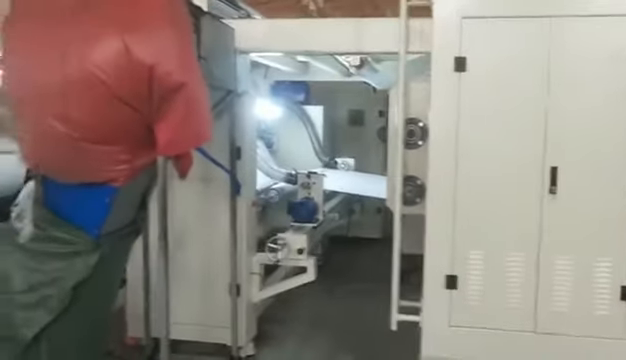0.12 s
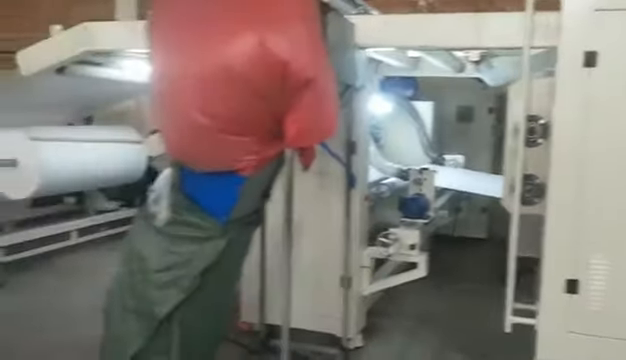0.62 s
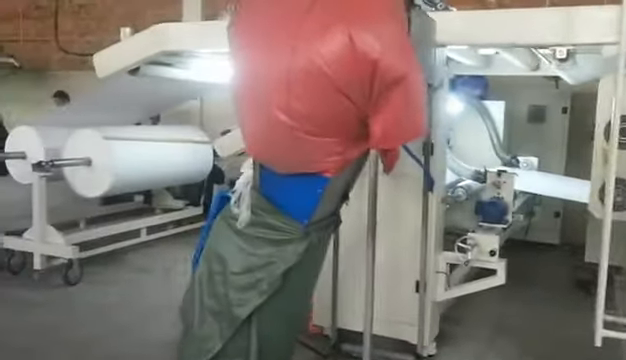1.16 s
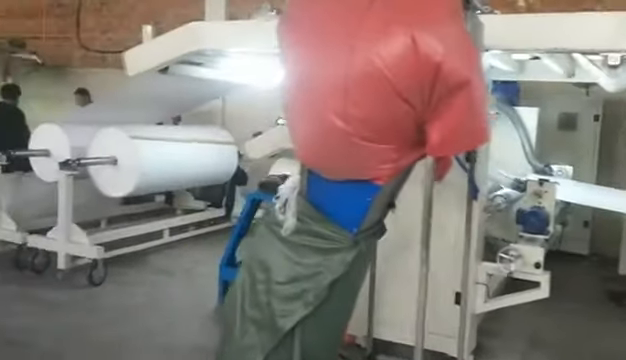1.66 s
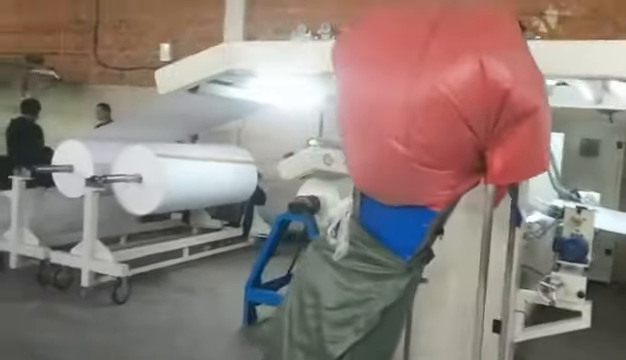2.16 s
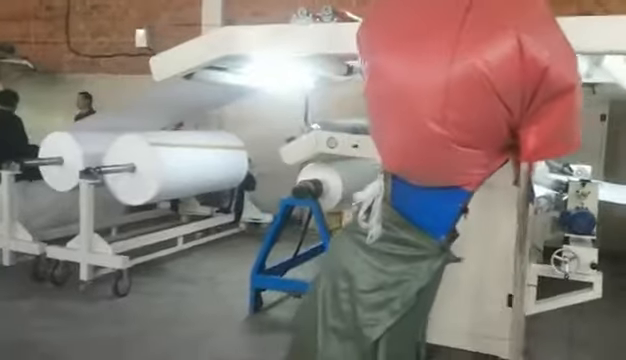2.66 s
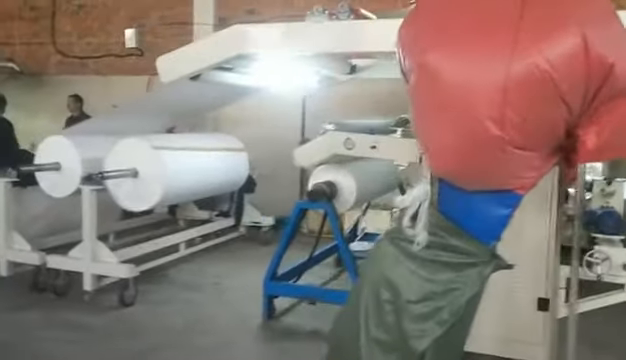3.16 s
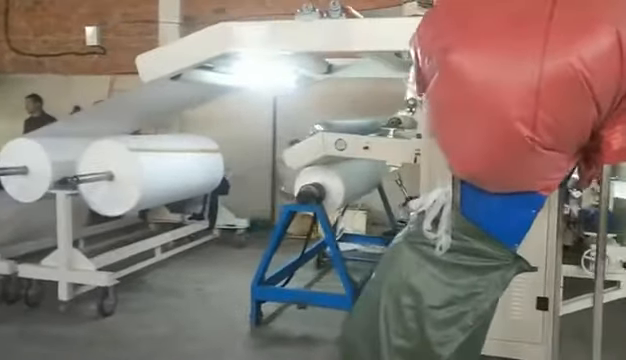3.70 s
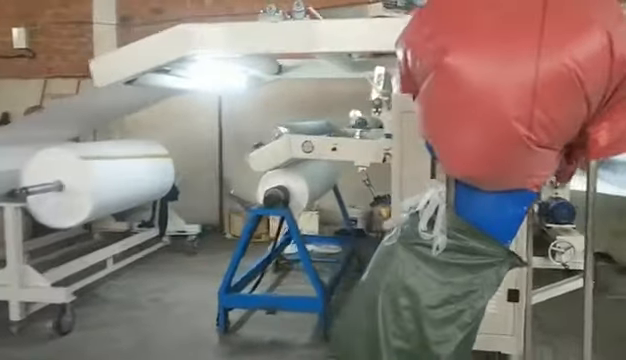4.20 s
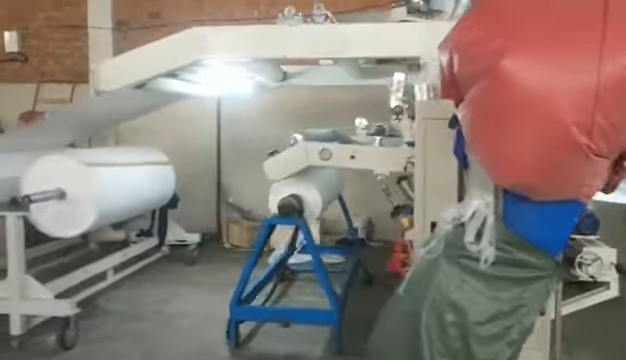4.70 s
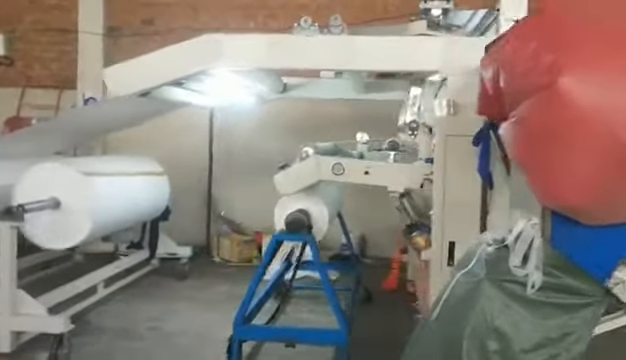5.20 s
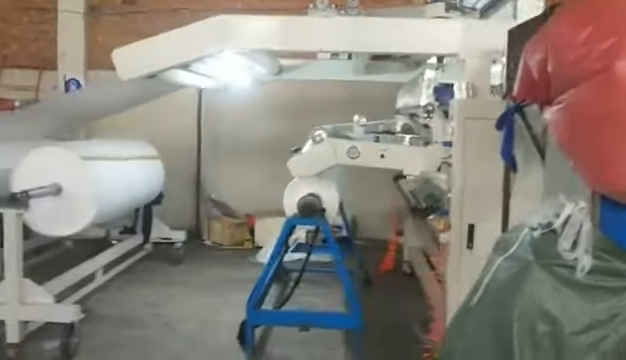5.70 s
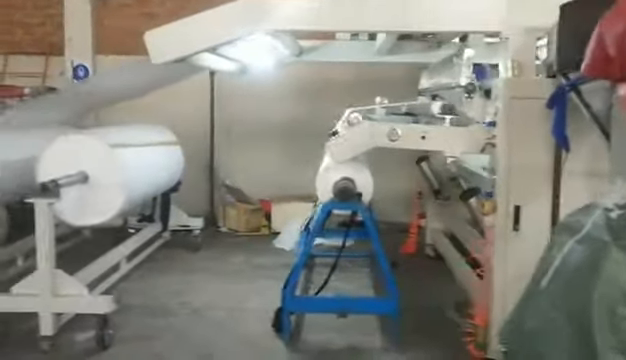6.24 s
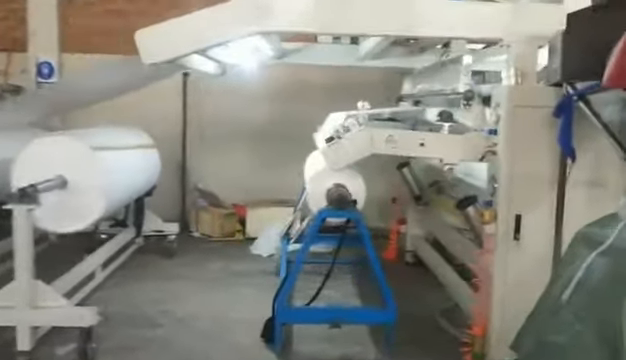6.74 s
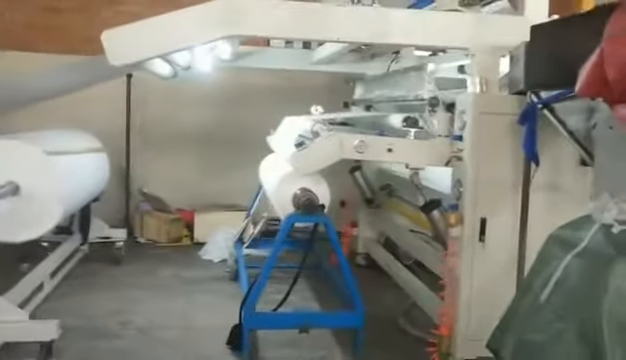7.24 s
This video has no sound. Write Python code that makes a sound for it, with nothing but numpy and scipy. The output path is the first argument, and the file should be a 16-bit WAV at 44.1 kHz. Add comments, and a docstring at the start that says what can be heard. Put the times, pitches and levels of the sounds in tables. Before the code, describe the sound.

Constant loud air roar from industrial blowers in a workshop, with a wavering blade whine drifting left and right and a faint low drive hum.

```python
"""A brick workshop where a large laminating line runs while the listener walks slowly along it.
Blowers push air through ducts: noise layers make a broad rush over a low rumble, coloured by resonances.
Wavering sines add a blade tone with its overtones, a drive hum and a faint gear whine.
The tones swell and fade as the walk crosses the hall's standing waves."""
import sys
import numpy as np
from scipy import signal
from scipy.fft import rfft, irfft, next_fast_len
from scipy.io import wavfile
from scipy.ndimage import uniform_filter1d

SR = 44100
rng = np.random.default_rng(int(sys.argv[2]) if len(sys.argv) > 2 else 0)


def decibels_to_gain(level_db):
    """Convert a level in decibels to a linear amplitude gain (20 dB per decade)."""
    exponent = np.asarray(level_db, float) / 20
    return 10 ** exponent


def wav_out(sig):
    """Save sig, one row per channel (or a flat mono array), as 16-bit PCM at SR to the path in sys.argv[1]."""
    wavfile.write(sys.argv[1], SR, np.round(np.clip(np.atleast_2d(sig).T, -1, 1) * 32767).astype(np.int16))


N = 325017   # length in samples

BLADE_HZ = 423.15   # lowest blade tone of the blower
# balance of the two microphone ports: f/Hz, left over right level/dB
PORT_BALANCE = [(450, -1), (800, 0.5), (1240, 2.5), (1900, 5), (2400, 6), (3300, 1.5), (3900, 5), (4300, 4),
                (5000, 3.5), (5700, 2.5), (7300, 0)]


def rms_one(x):
    """Scale to unit rms."""
    return x / np.sqrt(np.mean(x ** 2) + 1e-20)


def in_time(rows):
    """Columns of a curve over time, one value per sample."""
    s, *columns = np.transpose(rows)
    return [np.interp(np.arange(N) / SR, s, column) for column in columns]


def at_hz(points, hz):
    """Columns of a curve over frequency, read on a log axis."""
    table_hz, *columns = np.transpose(points)
    return [np.interp(np.log(hz), np.log(table_hz), column) for column in columns]


def drift(rate_hz):
    """Slow random wander of rms 1: white noise through two equal low-pass poles at rate_hz."""
    step = 40   # samples between computed points
    pole = np.exp(-2 * np.pi * rate_hz * step / SR)
    settle = 4000   # points dropped while the filter settles
    noise = rng.standard_normal(N // step + settle + 2)
    slow = signal.lfilter([1], [1, -2 * pole, pole * pole], noise)[settle:]
    return np.interp(np.arange(N) / step, np.arange(len(slow)), rms_one(slow - slow.mean()))


def standing_wave_swell(spread_db=3):
    """Random swell in dB, as standing waves are crossed."""
    return spread_db * drift(1.9)


def blower_closer_m():
    """Metres by which the blower is nearer; the shorter sound path shifts the pitch a little."""
    # the walk's approach to the blower: t/s, distance closer/m
    approach = [(0, 0.0063), (4.6, 0.0035), (6.3, .33), (7.0, .65), (7.37, .65)]
    return in_time(approach)[0]


def tone(hz, level_db, pan_db, lead, waver=0.58, closer_m=0):
    """A sine whose phase wanders by waver radians rms; the left port leads by lead radians."""
    sound_m_per_s = 343
    seconds = np.arange(N) / SR + closer_m / sound_m_per_s
    phase = 2 * np.pi * hz * seconds + waver * drift(2.7) + rng.uniform(0, 2 * np.pi)
    left = decibels_to_gain(level_db + pan_db / 2) * np.sin(phase + lead / 2)
    right = decibels_to_gain(level_db - pan_db / 2) * np.sin(phase - lead / 2)
    return np.sqrt(2) * np.array([left, right])   # levels are rms


def air_noise(spectrum, low_hz, high_hz, flutter_db):
    """Turbulent noise between two soft edges, through the duct resonances, as both ports hear it."""
    # housing and duct resonances, notches below zero:
    # f/Hz, width/Hz, then boost/dB at each of the four places
    ducts = [(88, 24, 3.5, 4.5, 4.5, 4.5), (111, 11, -3.5, -2.5, -1, -2.5), (191, 10, 0.5, 1.5, 3.5, -3),
             (216.7, 8.8, 4.5, -1, 4.5, 2.5), (298, 22, 4.5, 4.5, 3.5, 6), (367, 5.6, -0.5, -0.5, -1.5, -4),
             (564, 81, 0.5, 2.5, -2.5, 0), (641, 24, 4.5, 4, 2, 4.5), (676, 44, -1.5, -3, 3, 0.5),
             (726, 25, 4, 2, 5, 4), (757, 14, 4, 4, 7.5, 2.5), (1050, 7.4, 3, 1.5, -2.5, 1.7),
             (1137, 66, 1.5, 3, -0.5, 1.5), (1350, 50, 0, -0.5, -1.5, -1.5), (1540, 27, 4, 3, 6.5, -1),
             (1645, 18, 4.5, 0.5, 1.5, 1.5), (1690, 90, -1.5, 1.5, -0.7, -0.8), (1780, 33, 3.5, 3.5, 1, 0),
             (2210, 150, 1, 1, 1, 2), (2500, 150, -2, -0.2, -0.5, -1), (2666, 250, 0.5, 0.8, 2.5, 2),
             (3044, 90, 3, 0.5, 2.5, 1.5), (3350, 110, 2, -0.5, -4.5, -1), (3310, 100, 1, -0.5, 4.5, 2.5),
             (3570, 220, 2, 3.5, 4, 2), (3910, 80, 1.5, -4, -0.8, 0), (3960, 140, 1.5, 2, 2.5, -1),
             (4480, 270, -1.3, 0, 1.2, -1), (4720, 150, -1, -0.3, 0.5, -2), (4900, 140, 0.5, 1, -1.7, -0.5),
             (5750, 300, -1.6, -0.5, -1.5, -1.5), (6800, 300, -0.5, 1, 0, 1)]
    # when the walk passes the four places, each with its own duct strengths: t/s
    places_s = [.9, 2.7, 4.6, 6.4]
    # what the two ports share: f/Hz, diffuse share/dB, left lead/rad
    ports = [(60, -17, 0), (130, -20.5, 0.07), (190, -13.5, 0), (374, -7, .15), (480, -5.5, 0.38),
             (620, -3, 0.87), (870, -1.5, 0.88), (1080, -1.4, 1.5), (1410, 0.5, 1.6), (2300, 0, 1.5),
             (3620, -1, 2), (4200, -1.5, 1.7)]

    size = next_fast_len(N)
    hz = np.maximum(np.arange(size // 2 + 1) * SR / size, 1)
    # the outermost rows are not reached: the colour holds flat beyond the inner ones
    shape_db, = at_hz(spectrum, np.clip(hz, spectrum[1][0], spectrum[-2][0]))
    for centre_hz, width_hz, *boosts_db in ducts:
        resonance = 1 + (2 * (hz - centre_hz) / width_hz) ** 2
        shape_db = shape_db + np.array(boosts_db)[:, None] / resonance
    edges = 1 / np.sqrt((1 + (low_hz / hz) ** 12) * (1 + (hz / high_hz) ** 12))

    diffuse_db, lead = at_hz(ports, hz)
    alike = np.sqrt(1 - decibels_to_gain(2 * np.minimum(diffuse_db, 0)))
    tilt = decibels_to_gain(at_hz(PORT_BALANCE, hz)[0] / 2)
    shared, diffuse = rfft(rng.standard_normal((2, size)))
    # the right port hears a late copy of the left plus diffuse sound of its own
    left = tilt * shared
    right = (alike * np.exp(-1j * lead) * shared + np.sqrt(1 - alike ** 2) * diffuse) / tilt
    # the colour holds for the sum of both ports
    sum_gain = np.sqrt(tilt ** 2 + tilt ** -2 + 2 * alike * np.cos(lead))
    pair = np.array([left, right]) * edges / sum_gain

    # the walk fades from the colour of one place to the next
    out = 0
    for place_db, here in zip(shape_db, np.eye(len(places_s))):
        fade = np.interp(np.arange(N) / SR, places_s, here)
        out = out + irfft(pair * decibels_to_gain(place_db), size)[:, :N] * fade
    return out / np.std(out.mean(axis=0)) * decibels_to_gain(flutter_db * drift(7.1))


def gear_whine(level_db):
    """Faint high gear tone, a sine swelling in the standing waves while its lag wanders."""
    return tone(2705.0, level_db + standing_wave_swell(), 3.1, 0.74 + 1.5 * drift(0.41), waver=0.53)


def drive_hum(level_db):
    """Low tone of the drive, a sine that swells and fades slowly along the walk, with little waver."""
    return tone(371.4, level_db + standing_wave_swell(0.2), 0, 0.04, waver=0.16)


def low_rumble(level_db):
    """Low part of the blowers' turbulence, noise weighted towards the bass and low mids."""
    # rumble colour: f/Hz, relative level per Hz/dB
    rumble_colour = [(15, -57), (25, -26), (52, -18.5), (63, -17.5), (87, -5), (123, -6.5), (199, -1),
                     (299, -3.5), (341, -3.5), (373, -2.5), (586, -6.5), (698, -6), (785, -8.5),
                     (820, -2.5), (1070, -32.5), (1800, -120)]
    return decibels_to_gain(level_db) * air_noise(rumble_colour, low_hz=12, high_hz=833, flutter_db=-0.03)


def duct_roar(level_db):
    """Middle part of the air rush in the ducts, noise with a light flutter."""
    # roar colour: f/Hz, relative level per Hz/dB
    roar_colour = [(510, -31), (870, -4), (905, -4), (1020, -6.5), (1230, -5.5), (1370, -7.5), (1740, -7.5),
                   (2500, -10.5), (3250, -43), (5500, -120)]
    return decibels_to_gain(level_db) * air_noise(roar_colour, low_hz=887, high_hz=2550, flutter_db=0.22)


def air_hiss(level_db):
    """Upper part of the air rush, noise thinning out towards the treble."""
    # hiss colour: f/Hz, relative level per Hz/dB
    hiss_colour = [(1470, -30), (2500, -2.5), (4510, -8), (7180, -16), (7450, -12), (9680, -49),
                   (16400, -120)]
    return decibels_to_gain(level_db) * air_noise(hiss_colour, low_hz=2557, high_hz=9100, flutter_db=0.23)


def upper_blade_overtones(third_db, fourth_db):
    """Three and four times the blade tone; standing waves make level, side and lag wander."""
    out = 0
    for multiple, level_db in ((3, third_db), (4, fourth_db)):
        hz = multiple * BLADE_HZ
        swelling_db = level_db + standing_wave_swell()
        pan_db = at_hz(PORT_BALANCE, hz)[0] + 3.0 * drift(0.8)
        lead = 1.2 + 0.76 * drift(0.51)
        out = out + tone(hz, swelling_db, pan_db, lead, waver=0.65, closer_m=blower_closer_m())
    return out


def blade_tone(level_db):
    """Lowest tone of the blower blades, a sine swelling in the standing waves."""
    return tone(BLADE_HZ, level_db + standing_wave_swell(), 0, 0.05, closer_m=blower_closer_m())


def blade_whine():
    """Loud overtone at twice the blade tone; standing waves swell it differently at each port."""
    # swells along the walk: t/s, left level/dB, right level/dB
    whine_levels = [(0.0, -26, -22), (.15, -28, -24.5), (.32, -31, -27), (.55, -35, -36), (.85, -21, -30),
                    (1.05, -24, -25), (1.25, -27, -21.5), (1.55, -33, -35), (1.7, -29, -26),
                    (1.9, -25, -29), (2.15, -21.5, -26), (2.5, -30.5, -22), (2.8, -29, -24.5),
                    (3.3, -20.5, -27), (3.6, -27.5, -24), (3.8, -32, -30), (3.97, -20, -24),
                    (4.2, -18.5, -30), (4.5, -23, -25.5), (4.7, -22, -21), (5.0, -24, -32), (5.2, -29, -27),
                    (5.32, -24, -24), (5.45, -22, -17.5), (5.7, -20, -24), (5.95, -17.5, -34),
                    (6.2, -23.5, -42), (6.4, -24, -26), (6.65, -37, -27), (6.9, -18, -35), (7.05, -22, -33),
                    (7.2, -27.5, -28), (7.37, -29.5, -22)]
    # phase of left ahead of right along the walk: t/s, lead/rad
    whine_lead = [(0, 2), (.45, -1), (.7, 1.7), (1.5, 1), (2.0, 0), (3.0, 0.4), (3.5, 1.5), (3.9, 0.5),
                  (4.3, 1), (5.6, 0.24), (6.1, 1.5), (6.35, -3.5), (6.6, -1.5), (6.8, 1.3), (7.1, -2.5),
                  (7.37, -2)]
    left_db, right_db = in_time(whine_levels)
    level_db = (left_db + right_db) / 2 + 0.7 * drift(9.0)   # a quick light flutter
    lead = in_time(whine_lead)[0] + 0.12 * drift(1.9)
    return tone(2 * BLADE_HZ, level_db, left_db - right_db, lead, waver=0.2, closer_m=blower_closer_m())


def scene():
    """Gear and drive, the three air layers, then the blade tones."""
    # air along the walk: t/s, rumble level/dB, duct roar level/dB, air hiss level/dB
    air_levels = [(0.0, -20, -18, -21.5), (.8, -20, -18.5, -22.5), (1.9, -19.5, -19.5, -23.5),
                  (3.0, -19.5, -19, -24), (4.3, -18.5, -20, -25), (5.3, -19, -20, -24),
                  (6.1, -18.5, -19, -23.5), (7.37, -19.5, -19.5, -22)]
    # fainter tones along the walk: t/s, lowest blade tone level/dB, hum level/dB, gear level/dB,
    # three times blade tone level/dB, four times blade tone level/dB
    faint_levels = [(0.0, -38, -28, -43, -31, -31), (.5, -35, -35, -47, -38, -31.5),
                    (1.1, -33.5, -39, -43.5, -38, -38), (1.9, -32.5, -42, -52.5, -47, -41),
                    (2.4, -44.5, -41, -52, -45, -34), (2.9, -46, -33, -47, -44.5, -38),
                    (3.6, -44, -31.5, -54, -35, -40), (4.1, -45, -32, -40, -32.5, -32.5),
                    (4.6, -49, -32.5, -33, -43, -44), (5.0, -33, -28, -52, -45, -48.5),
                    (5.7, -42, -31.5, -36, -41, -51), (6.4, -32, -37, -39, -32.5, -47),
                    (7.0, -33, -47, -32.5, -34, -44), (7.37, -33, -41.5, -41, -42, -47)]
    rumble_db, roar_db, hiss_db = in_time(air_levels)
    blade_db, hum_db, gear_db, third_db, fourth_db = in_time(faint_levels)
    machine = gear_whine(gear_db) + drive_hum(hum_db)
    air = low_rumble(rumble_db) + duct_roar(roar_db) + air_hiss(hiss_db)
    blades = upper_blade_overtones(third_db, fourth_db) + blade_tone(blade_db) + blade_whine()
    return machine + air + blades


def thinned(pair, side_drop_db, side_spread_db, mid_drop_db, drop_spread_db):
    """Faint spots of the spectrum drop out: the bass turns mono in fits, the treble flickers."""
    # how readily faint cells drop out: f/Hz, rise of the drop threshold/dB
    dropout = [(100, -13), (2700, -1.5), (3100, 4), (4050, 5), (4250, -4), (5000, -2), (5600, 2.5),
               (7000, 3.5), (7500, 7)]
    size = 1536   # samples per frame
    window = np.sin(np.pi * (np.arange(size) + 0.5) / size)
    mid_side = np.array([pair[0] + pair[1], pair[0] - pair[1]]) / 2
    hz, _, cells = signal.stft(mid_side, SR, window=window, nperseg=size)
    frames = cells.shape[2]
    power = np.abs(cells) ** 2
    around = uniform_filter1d(uniform_filter1d(power[0], size=15, axis=0), size=3, axis=1)

    # the side is compared with the middle; the threshold jumps from frame to frame
    jumps_db = side_spread_db * rng.standard_normal(frames)
    side_power = uniform_filter1d(power[1], size=5, axis=0)
    cells[1] *= side_power > around * decibels_to_gain(2 * (side_drop_db + jumps_db))

    # each band has a restless threshold of its own
    band = (22 * np.log1p(hz / 1500)).astype(int)
    band_noise = rng.standard_normal((2, band[-1] + 1, frames))
    restless = uniform_filter1d(band_noise, size=2, axis=2)[:, band]
    rise_db = at_hz(dropout, np.maximum(hz, 1))[0][:, None]
    threshold = around * decibels_to_gain(2 * (mid_drop_db + rise_db + drop_spread_db * restless))
    left_right = np.array([cells[0] + cells[1], cells[0] - cells[1]])
    left_right *= np.abs(left_right) ** 2 > 2 * threshold
    as_ports = np.array([left_right[0] + left_right[1], left_right[0] - left_right[1]]) / 2

    # above 1 kHz some frames lose cells port by port, all else as middle and side
    by_port = (rng.random(frames) < 0.45) & (hz > 1000)[:, None]
    cells = np.where(by_port, as_ports, cells * (power > threshold))
    mid, side = signal.istft(cells, SR, window=window, nperseg=size)[1][:, :N]
    return np.array([mid + side, mid - side])


def top_cut(x):
    """Nothing passes above the cut-off."""
    return signal.sosfilt(signal.butter(12, 8790, fs=SR, output="sos"), x)


def record(dry):
    """Faint cells drop out, the top is cut steeply and peaks beyond full scale clip."""
    thin = thinned(dry, side_drop_db=-7.5, side_spread_db=5.0, mid_drop_db=-6.0, drop_spread_db=9.0)
    steep_cut = signal.ellip(14, 0.3, 90, 7464, fs=SR, output="sos")   # low-pass at 7464 Hz
    mix = np.clip(signal.sosfilt(steep_cut, thin), -1, 1)
    return top_cut(mix)


dry = scene()
out = record(dry)
wav_out(out)
```